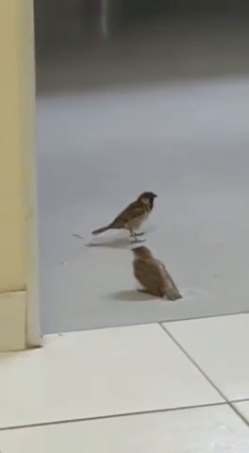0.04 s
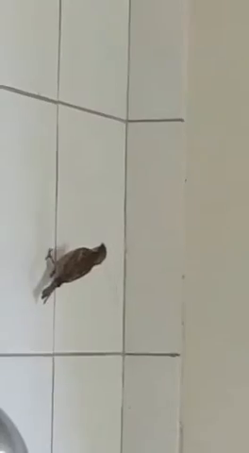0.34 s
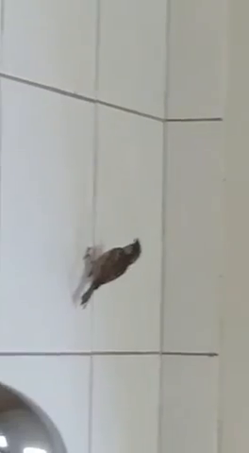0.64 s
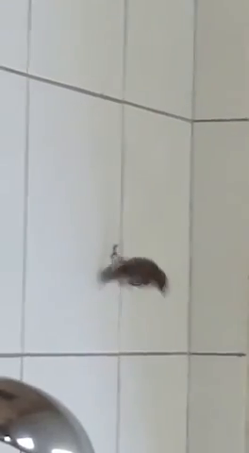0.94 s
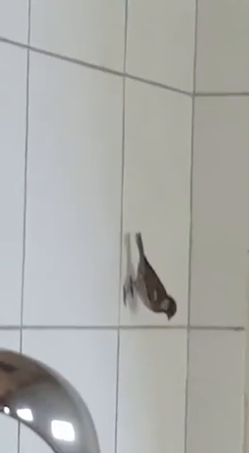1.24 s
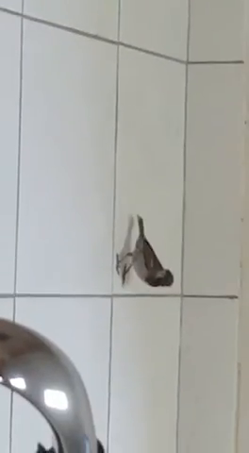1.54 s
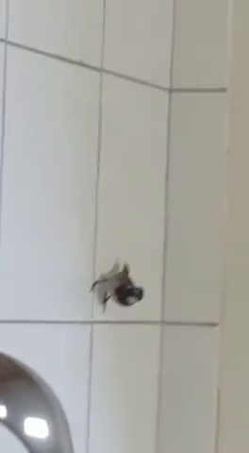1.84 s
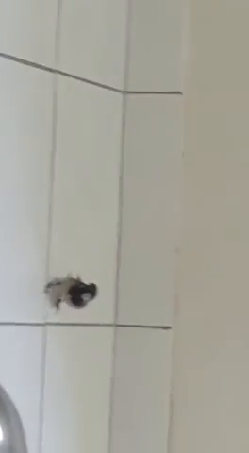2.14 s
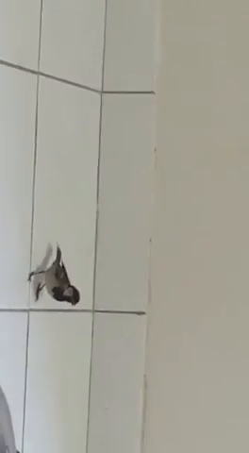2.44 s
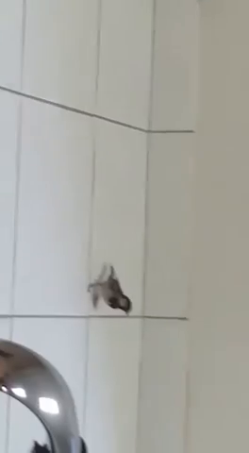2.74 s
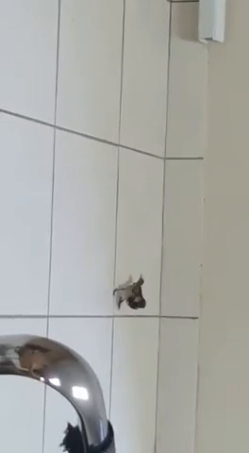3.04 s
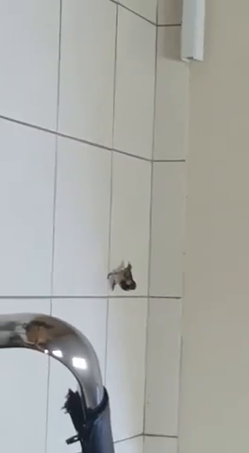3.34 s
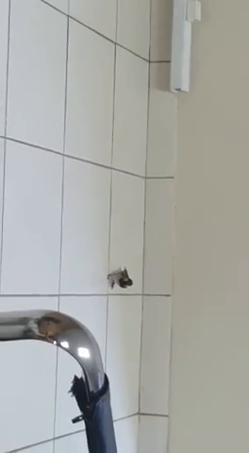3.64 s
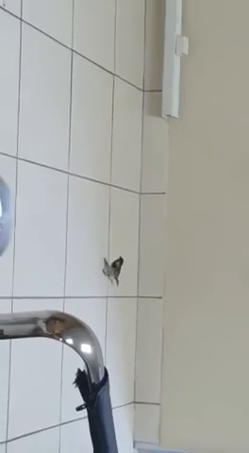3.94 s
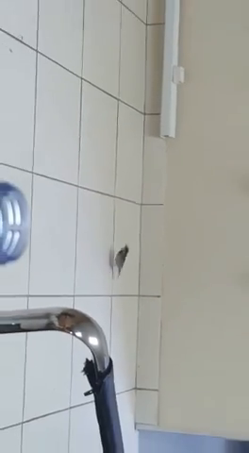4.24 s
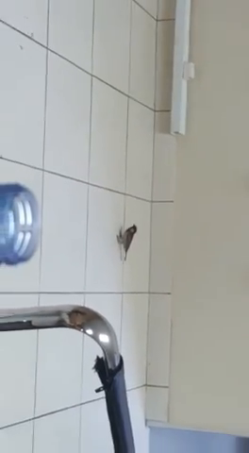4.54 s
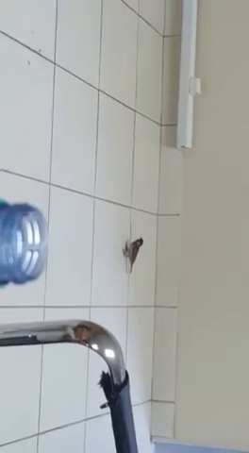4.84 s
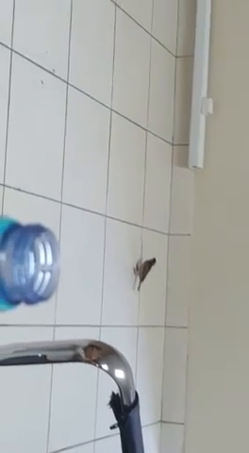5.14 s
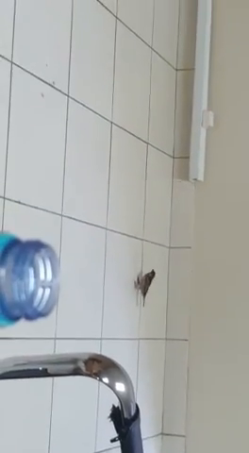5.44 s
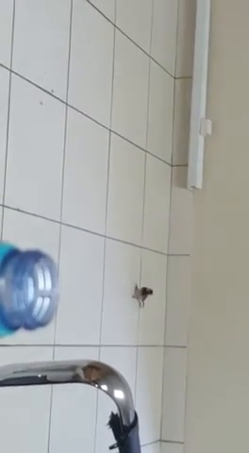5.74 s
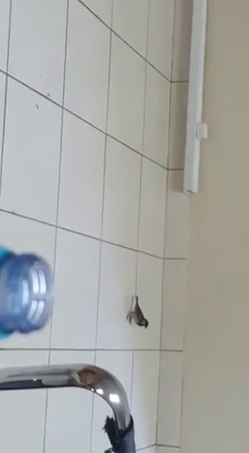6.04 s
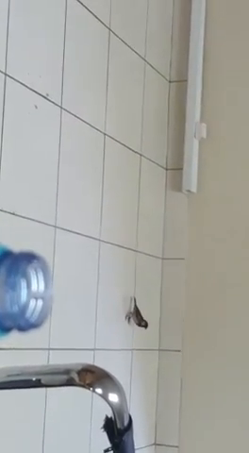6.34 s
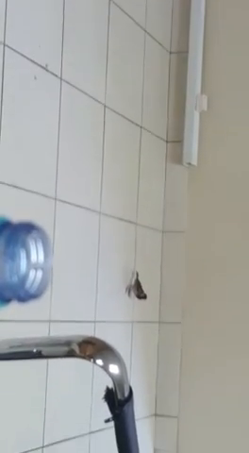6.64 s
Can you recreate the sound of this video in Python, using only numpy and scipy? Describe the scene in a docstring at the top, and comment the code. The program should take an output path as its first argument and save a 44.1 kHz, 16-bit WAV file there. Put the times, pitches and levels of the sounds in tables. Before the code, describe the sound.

Over a faint low hum and dull rush of air from distant machines, a sparrow gives one chirp, with a couple of tiny ticks around it. It then chatters in eight short, rough bursts, each a falling rasp followed by rapid higher chirps, with brief pauses between them. A barely audible wing rustle comes early on. The microphone picks up both the bird and the bright echo of a tiled passage.

```python
"""A sparrow scolds in a tiled passage: each burst opens with a low falling rasp and most run on in
higher notes, ten a second. Both sides of its voice box (the syrinx) sound at once, roughly, and its
throat and beak shape the tone. The hard walls ring for about a second after every note.
Distant machinery hums underneath; there is a lone chirp, two small ticks and a faint wing rustle."""
import sys
import numpy as np
from scipy import signal
from scipy.fft import rfft, irfft, next_fast_len
from scipy.io import wavfile
from scipy.ndimage import map_coordinates

SR = 44100
rng = np.random.default_rng(int(sys.argv[2]) if len(sys.argv) > 2 else 0)


def store_wav(level_fs):
    """Save 16-bit WAV to argv[1]."""
    pcm = np.round(np.clip(np.atleast_2d(level_fs), -1, 1) * 32767)
    wavfile.write(sys.argv[1], SR, pcm.T.astype(np.int16))


N = 299439
LEAD = SR // 2  # samples of run-up, so that the walls are already ringing at the start
RING = SR + SR // 4  # samples in an echo tail

# how throat and beak colour the chatter and the lone chirp: (frequency [Hz], gain [dB])
CHATTER_COLOUR = [(600, -73), (1100, -11), (1600, -14), (2200, -17), (2550, -1.5), (3200, -7.5), (3750, -1),
                  (4300, -2.5), (4900, -4.5), (5700, -10.5), (7500, -21), (11500, -18.5), (14000, -31.5),
                  (16000, -24)]


def amp(db):
    """Turn decibels into a gain."""
    return 10 ** (np.asarray(db) / 20)


def unit(x):
    """Scale to an average (rms) strength of 1."""
    return x / np.sqrt(np.mean(x ** 2) + 1e-20)


def along(points, hz):
    """Read between (frequency [Hz], value) points on a log frequency axis."""
    freqs, values = np.transpose(points)
    return np.interp(np.log(hz + 1), np.log(freqs + 1), values)


def wobble(rate, size):
    """A smooth curve through random points, rate of them a second."""
    knots = rng.standard_normal(size // 4 + 8)
    return map_coordinates(knots[:int(size * rate / SR) + 4], [np.arange(size) * rate / SR])


def filtered(x, response):
    """Scale each frequency in x by the gain response(hz)."""
    n = x.shape[-1]
    padded = next_fast_len(n + 4096)
    return irfft(rfft(x, padded) * response(np.fft.rfftfreq(padded, 1 / SR)), padded)[..., :n]


def coloured(x, curve):
    """Filter x by a curve of (frequency [Hz], gain [dB]) points."""
    return filtered(x, lambda hz: amp(along(curve, hz)))


def add(track, start_s, sound):
    """Mix a sound into a track that begins with the run-up."""
    part = track[..., max(0, LEAD + round(start_s * SR)):][..., :sound.shape[-1]]
    part += sound[..., :part.shape[-1]]


def air_rush(swell_db):
    """A dull, slowly swelling rush of air, nearly the same left and right in the bass."""
    # colour of the rush: (frequency [Hz], level [dB])
    colour = [(20, -16), (42, -16), (60, 1.5), (80, -7), (115, -0.5), (170, -4), (260, -2), (370, -13),
              (600, -16), (1000, -19.5), (2000, -26), (4500, -31), (8000, -44.5), (15500, -48.5)]
    # how alike left and right are: (frequency [Hz], likeness [0 to 1])
    likeness = [(60, 0.97), (150, 0.95), (300, 0.87), (600, 0.6), (1200, 0.046), (8000, 0)]

    def mid_and_side(hz):
        width = np.arccos(np.clip(along(likeness, hz), -1, 1)) / 2
        return amp(along(colour, hz)) * [np.cos(width), np.sin(width)]

    mid, side = filtered(rng.standard_normal((2, N)), mid_and_side)
    air = unit(np.array([mid + side, mid - side]))
    swelling_band = filtered(air, lambda hz: along([(130, 0), (230, .85), (450, 0), (900, 0)], hz))
    return air + swelling_band * (amp(swell_db * wobble(1.9, N)) - 1)


def machinery(air_db, hum_db, waver_db):
    """Distant machines: wavering hums on a rush of air; the deepest hum surges once."""
    # tones of the hum: (frequency [Hz], level before hum_db [dB])
    hum_tones = [(97, -51.5), (119, -54), (156, -54), (194, -56), (350, -69.5), (414.5, -61.5),
                 (701, -67.5), (1405, -73)]
    t = np.arange(N) / SR

    def tone(hz, depth_db):
        wave = np.sin(2 * np.pi * hz * t + wobble(5, N))
        return unit(wave * amp(depth_db * wobble(5, N)))

    air = amp(air_db) * air_rush(swell_db=.8)
    hum = sum(amp(db + hum_db) * tone(hz, waver_db) for hz, db in hum_tones)
    start_s, ramp_s, hold_s = .29, .059, .69
    surge_db = np.interp(t, start_s + np.cumsum([0, ramp_s, hold_s, ramp_s]), [0, 10, 10, 0])
    motor = amp(-55 + surge_db) * tone(hz=64, depth_db=0)
    return air + hum + motor


def ticks(fade_s):
    """Two dry ticks: snaps of noise that fall 60 dB in fade_s."""
    # the ticks: (time [s], level before colouring [dB])
    snaps = [(.1995, -43), (.3375, -15.5)]
    track, t = np.zeros((2, LEAD + N)), np.arange(SR // 50) / SR
    for start, db in snaps:
        snap = rng.standard_normal((2, len(t))) * amp(db - 60 * t / fade_s)
        add(track, start, coloured(snap, [(400, -20), (1500, 1), (4500, 3.5), (8000, -11), (15000, -22)]))
    return track[:, LEAD:]


def wing_rustle(start_s, db):
    """Wings rustle: a brief, high, fluttering hiss."""
    track, size = np.zeros((2, LEAD + N)), SR // 5
    hiss = coloured(rng.standard_normal((2, size)), [(2000, -30), (6000, -1), (12000, -5), (16000, -6)])
    flutter = amp(db + 4.6 * wobble(70, size))
    add(track, start_s, flutter * np.hanning(size) * unit(hiss))
    return track[:, LEAD:]


def echo_tail():
    """Countless echoes blur into a stereo tail of energy 1; the treble dies first."""
    # how long the passage rings: (frequency [Hz], time to fall 60 dB [s])
    ring_times = [(500, 2.23), (2200, 0.78), (3200, 0.8), (4300, 0.75), (5500, 0.72), (7500, 0.62),
                  (11000, 0.55), (16000, 0.45)]
    hz, t, spectrum = signal.stft(rng.standard_normal((2, RING)), SR, nperseg=256)
    fade = amp(-60 * t / along(ring_times, hz)[:, None])
    tail = signal.istft(spectrum * fade, SR, nperseg=256)[1][:, :RING]
    tail *= 1 - np.exp(-np.arange(tail.shape[1]) / SR / .016)  # the echoes take a moment to build
    return tail / np.linalg.norm(tail, axis=1, keepdims=True)


def tile_echoes(spread_s, count):
    """The first sharp bounces off floor and walls, with energy 1."""
    echoes = np.zeros((2, RING))
    for side, lateness in zip(echoes, rng.uniform(.02, 1, (2, count))):
        side[(lateness * spread_s * SR).astype(int)] = np.exp(-lateness) * rng.choice([-1, 1], count)
    return echoes / np.linalg.norm(echoes, axis=1, keepdims=True)


def passage(calls, direct_db, early_db, tail_db, change_rad):
    """Each note arrives directly, off the tiles and as a tail; the paths change as the bird moves."""
    # stereo balance: (frequency [Hz], left minus right [dB])
    balance = [(1000, 1), (2400, -1), (4000, -2.5), (6000, -3), (9000, 0), (14000, 5)]
    track, shared_tail = np.zeros((2, LEAD + N)), echo_tail()
    for start, sound in calls:
        paths = amp(tail_db) * (np.cos(change_rad) * shared_tail + np.sin(change_rad) * echo_tail())
        paths += amp(early_db) * tile_echoes(spread_s=.03, count=14)
        paths[0, 0] += amp(direct_db)
        paths[1, rng.integers(0, 8)] += amp(direct_db)  # up to 7 samples later on the right
        add(track, start, signal.fftconvolve(sound[None], paths, axes=1))
    return filtered(track[:, LEAD:], lambda hz: amp(along(balance, hz) * np.array([[.5], [-.5]])))


def syrinx_side(pitch, jitter, flutter_hz, rough_db):
    """One side of the voice box vibrates: a tone whose pitch and strength flutter unevenly."""
    # parts of the tone: (multiple of the pitch, level [dB])
    harmonics = [(1, -1.5), (2, 3.5), (3, -6.5), (4, -7.5), (5, -27)]
    size = len(pitch)
    phase = 2 * np.pi * np.cumsum(pitch * (1 + jitter * wobble(flutter_hz, size))) / SR
    tone = sum(amp(db) * np.sin(round(k) * phase) for k, db in harmonics)
    return unit(tone * amp(rough_db * wobble(flutter_hz, size)))


def note(pitch_hz, length_s, course, throat, rest_hz, low_ratio, low_db, whistle_db, lisp_db, attack_s):
    """Two clashing voice-box tones and a hiss of breath, coloured by throat and beak."""
    size = SR // 8
    progress = np.arange(size) / SR / length_s
    share, *columns = np.transpose(course)
    bend, voice_db, air_db = (np.interp(progress, share, column) for column in columns)
    pitch = pitch_hz * bend
    high = syrinx_side(pitch, jitter=.02, flutter_hz=900, rough_db=3)
    low = syrinx_side(pitch * low_ratio, jitter=.065, flutter_hz=1200, rough_db=3)
    source = amp(voice_db) * (high + amp(low_db) * low) + amp(air_db) * rng.standard_normal(size)
    gate = np.clip(progress * length_s / attack_s, 0, 1) * np.clip((1.1 - progress) / .092, 0, 1)
    spurts = amp(1.6 * wobble(450, size))  # the air leaves unevenly
    tighten = (pitch_hz / rest_hz) ** .8  # the throat tightens, so higher notes are brighter
    voice = filtered(source * gate * spurts, lambda hz: amp(along(throat, hz / tighten)))
    voice = unit(voice) * np.sqrt(length_s * SR / size)
    # a short high lisp as the beak opens
    hiss = coloured(rng.standard_normal(size), [(4000, -32), (5600, -4), (6800, -13), (8200, -45)])
    lisp = amp(lisp_db) * unit(hiss) * np.exp(-((progress - .12) / .09) ** 2)
    # a clean whistle breaks through about a third of the way in
    crest = np.exp(-((progress - .36) / .22) ** 2)
    whistle = amp(whistle_db) * crest * np.sin(2 * np.pi * np.cumsum(pitch) / SR)
    return voice + whistle + lisp


def pushed(extra_db, usual_hz, usual_s):
    """Pitch and length of a note sung extra_db harder than usual: it gets higher and shorter."""
    return usual_hz * np.exp(.015 * extra_db), usual_s * np.exp(-.036 * extra_db)


def lone_chirp(db, hz, length_s):
    """A chirp that swells out of a hiss."""
    # how it unfolds: (progress [0 to 1], pitch [ratio], voice [dB], breath [dB])
    course = [(0, .7, -31, -12), (.3, .8, -10, 2), (.6, 0.71, -11.5, 1.5), (.8, 0.95, 1.5, -6),
              (1, 0.9, -5, -34)]
    return amp(db) * note(hz, length_s, course, CHATTER_COLOUR, rest_hz=2410, low_ratio=.88,
                          low_db=1, whistle_db=-16, lisp_db=-6.5, attack_s=.002)


def rasp_note(db, usual_db=-20.5):
    """The low falling rasp that opens a burst."""
    # how it unfolds: (progress [0 to 1], pitch [ratio], voice [dB], breath [dB])
    course = [(0, 1.15, -18, -5), (.1, 1.1, -11, 3.5), (.27, 1.04, 3, -1.5), (.5, 1.01, -1.5, -7.5),
              (.75, .95, -9.5, -2), (1, .8, -10, -19)]
    # how throat and beak colour it: (frequency [Hz], gain [dB])
    throat = [(600, -85), (1000, -14.5), (1400, -5.5), (1900, -17.5), (2200, -4.5), (2700, -0.5),
              (3500, -4.5), (3900, -1.5), (4350, -0.5), (5100, 1), (6800, -18.5), (8000, -17), (11000, -12),
              (14000, -23.5), (16000, -21)]
    hz, length_s = pushed(db - usual_db, usual_hz=1822, usual_s=.073)
    return amp(db) * note(hz, length_s, course, throat, rest_hz=1856, low_ratio=.92,
                          low_db=4.5, whistle_db=-14.5, lisp_db=-5, attack_s=.0012)


def chatter_note(db, usual_db=-18.5):
    """One of the higher notes that follow; its pitch rises and falls."""
    # how it unfolds: (progress [0 to 1], pitch [ratio], voice [dB], breath [dB])
    course = [(0, .88, 0.5, 3.5), (.14, .98, -8.5, 3.5), (.32, 1, 2.5, -1.5), (.55, 0.8, -4, -3.5),
              (.8, .87, -11.5, -1), (1, 0.86, 2.5, -6.5)]
    hz, length_s = pushed(db - usual_db, usual_hz=2275.5, usual_s=.054)
    return amp(db) * note(hz, length_s, course, CHATTER_COLOUR, rest_hz=2233, low_ratio=.88,
                          low_db=3, whistle_db=-4.5, lisp_db=-11, attack_s=.0035)


def burst(start, count, spacing, rasp_db, chatter_db, build_db):
    """A rasp, then even chatter that builds or eases off, as (start, sound) pairs."""
    hurry_s, pause_s, weaker_db = .003, .029, 4.5
    calls = [(start, rasp_note(rasp_db))]
    for k in range(round(count)):
        tired = k >= 5  # after five notes the bird hesitates and goes on weaker
        onset = start + (k + 1) * spacing - hurry_s + tired * pause_s
        calls.append((onset, chatter_note(chatter_db + k * build_db - tired * weaker_db)))
    return calls


def sparrow():
    """All the bird's notes, as (start, sound) pairs."""
    # scolding bursts: (time [s], chatter notes [count], spacing [s], rasp level [dB],
    # first chatter level [dB], change per note [dB])
    bursts = [(-.24, 0, .1, -18, -19, -2), (.721, 3, .0955, -21, -18, 1), (1.616, 3, 0.096, -22, -19, 0.05),
              (2.325, 2, 0.1, -20, -19, -0.9), (3.02, 2, 0.097, -22, -19, -.3),
              (3.566, 3, .1, -20, -18.5, 0.34), (4.582, 6, .098, -22.5, -19.5, 0.85),
              (5.617, 2, .095, -19.5, -19, 0.7), (6.267, 3, 0.1, -19, -18, -0.14)]
    # the lone chirp: (time [s], level [dB], base pitch [Hz], length [s])
    chirps = [(0.288, -23, 2299, .06)]
    calls = [call for row in bursts for call in burst(*row)]
    return calls + [(start, lone_chirp(db, hz, length_s)) for start, db, hz, length_s in chirps]


def scene():
    """The bird in its passage, over the small sounds and the machinery."""
    bird = passage(sparrow(), direct_db=-12.5, early_db=-9.5, tail_db=-8, change_rad=.91)
    small_sounds = ticks(fade_s=.0075) + wing_rustle(start_s=1.4, db=-67.5)
    return bird + small_sounds + machinery(air_db=-45, hum_db=-.5, waver_db=4.5)


def record(dry):
    """Cut off the very highest treble."""
    return filtered(dry, lambda hz: hz < 15850)


dry = scene()
out = record(dry)
store_wav(out)
```